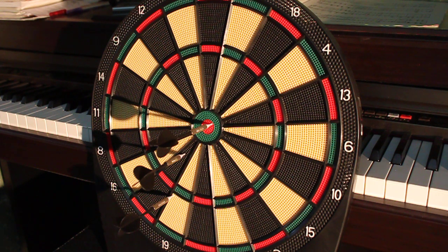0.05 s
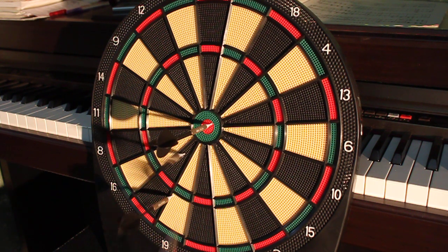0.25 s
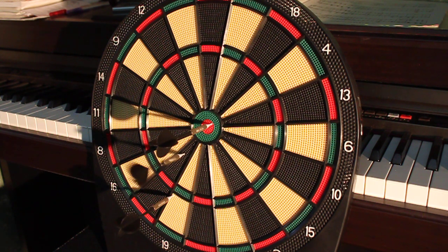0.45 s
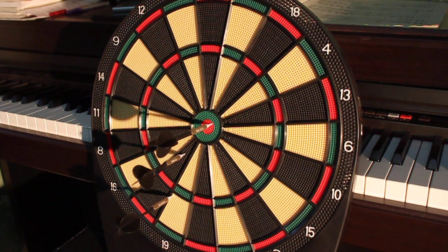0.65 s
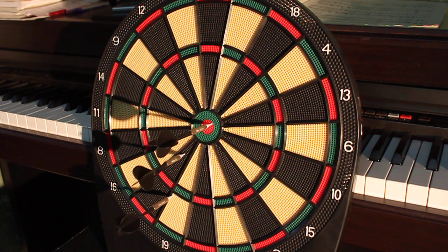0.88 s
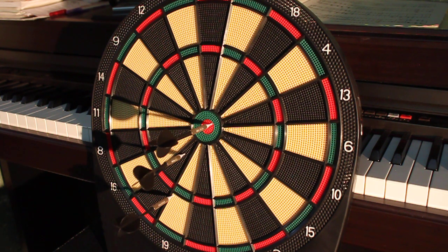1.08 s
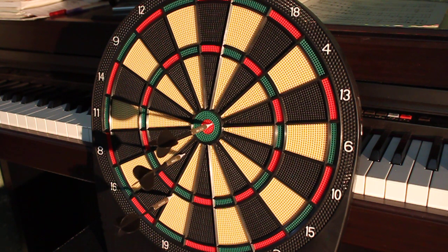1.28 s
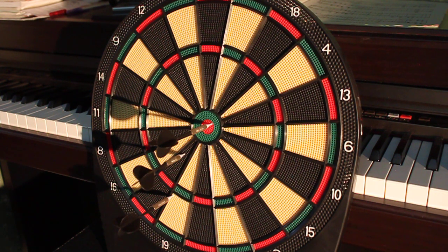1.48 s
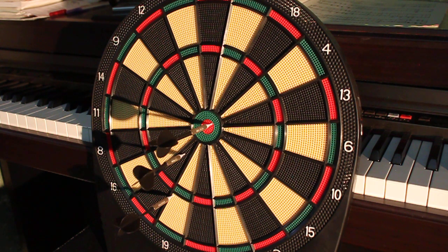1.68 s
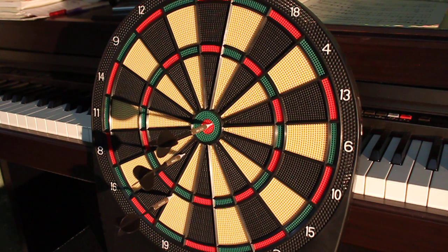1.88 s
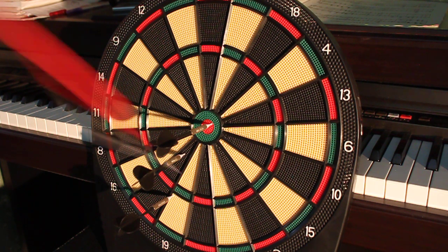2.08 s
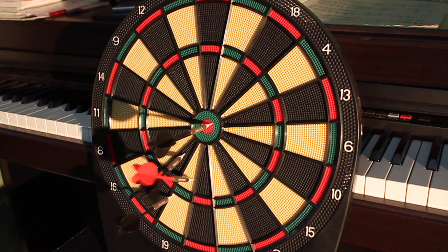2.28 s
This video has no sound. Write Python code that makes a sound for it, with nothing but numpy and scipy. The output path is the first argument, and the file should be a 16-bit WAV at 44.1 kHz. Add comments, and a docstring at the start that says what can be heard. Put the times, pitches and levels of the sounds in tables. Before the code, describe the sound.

Two darts strike a plastic electronic dartboard about two seconds apart, each with a sharp clack and short rattle. Two soft thumps and a faint rustle fall between them, heard close up in a small room with low hum.

```python
"""Two soft-tip darts hit a plastic electronic dartboard, close up in a small room.
Each tip ticks into its hole, then the segment slams into the case, which rings and rattles.
Two soft thumps fall between the throws, with faint rustles around them. The recorder's gain
control ducks at each hit and slowly lets the room noise and mains hum swell back."""
import sys
import numpy as np
from scipy import signal
from scipy.fft import rfft, irfft, next_fast_len
from scipy.io import wavfile
from scipy.ndimage import uniform_filter1d, minimum_filter1d

SR = 44100
rng = np.random.default_rng(int(sys.argv[2]) if len(sys.argv) > 2 else 0)


def dump(signal):
    """Clip the signal to [-1, 1] and save it as 16-bit WAV at the path in sys.argv[1]."""
    limited = np.clip(np.atleast_2d(signal).T, -1, 1)
    pcm = np.round(limited * 32767).astype(np.int16)
    wavfile.write(sys.argv[1], SR, pcm)


N = 108045
T = np.arange(int(.7 * SR)) / SR  # time within one hit, s


def amp(db):
    """Decibels to gain."""
    return 10 ** (np.asarray(db) / 20)


def along(points, hz):
    """Read a curve of (Hz, value) points on a log frequency axis."""
    f, v = np.transpose(points)
    return np.interp(np.log(hz + 1), np.log(f + 1), v)


def fade(t60, t=T):
    """Exponential decay, 60 dB down after t60 seconds."""
    return np.exp(-np.log(1000) * t / t60)


def rise(attack_s):
    """Exponential attack toward full level."""
    return 1 - np.exp(-T / attack_s)


def add(track, s, sound):
    """Mix a sound in at s seconds."""
    part = track[round(s * SR):][:len(sound)]
    part += sound[:len(part)]


def coloured(x, db_at):
    """Minimum-phase EQ with gain db_at(hz): nothing rings ahead of a transient."""
    m = 2 * next_fast_len(len(x))
    cepstrum = irfft(np.log(amp(db_at(np.fft.rfftfreq(m, 1 / SR)))), m)
    cepstrum[1:m // 2] *= 2
    cepstrum[m // 2 + 1:] = 0
    return irfft(rfft(x, m) * np.exp(rfft(cepstrum)), m)[:len(x)]


def normalised(x):
    """Scale to the energy of 2 ms at full level."""
    return x / np.linalg.norm(x) * np.sqrt(.002 * SR)


def burst(envelope, colour, rings_hz=(), octaves=1, peak_db=8.5):
    """A contact: enveloped noise through an EQ with resonant peaks, `octaves` in half-width."""
    def db_at(hz):
        peaks = sum(peak_db / (1 + (np.log2((hz + 1) / centre) / octaves) ** 2) for centre in rings_hz)
        return along(colour, hz) + peaks
    return normalised(coloured(envelope * rng.standard_normal(len(T)), db_at))


def ring(modes, attack_s):
    """Damped (Hz, dB, t60) modes, each struck about 1 dB differently every time."""
    waves = [amp(db + rng.normal()) * fade(t60) * np.sin(2 * np.pi * hz * T) for hz, db, t60 in modes]
    return sum(waves) * rise(attack_s)


# Room tone EQ: f/Hz, level/dB
AIR_EQ = [(20, -9.5), (55, -12), (150, -13), (260, -14.5), (700, -9.5), (1100, -6.5), (2000, -14),
          (3000, -12), (5000, -18.5), (8000, -26.5), (13000, -28), (15800, -28.5)]
# Mains harmonics: harmonic number, level/dB
HUM_HARMONICS = [(1, -55), (2, -67), (4, -59), (5, -62.5), (6, -64.5), (7, -63.5), (9, -54), (11, -58.5)]

def background(air_db=-46.5, mains_hz=59.74):
    """A steady bed of room noise and mains hum."""
    air = coloured(rng.standard_normal(N), lambda hz: along(AIR_EQ, hz))
    cycles = mains_hz * np.arange(N) / SR
    hum = sum(amp(db) * np.sqrt(2) * np.sin(2 * np.pi * (k * cycles + rng.random()))
              for k, db in HUM_HARMONICS)
    return amp(air_db) * air / air.std() + hum


# Rustle cues: t/s, length/s, level/dB
RUSTLE_CUES = [(0, 0.057, -39.5), (0.779, 0.056, -72), (1.41, 0.32, -49.5)]
# Rustle EQ: f/Hz, level/dB
RUSTLE_EQ = [(300, -11), (1500, -0.5), (3500, -1.5), (5200, 0), (7000, -8), (15000, -16.5)]

def rustles():
    """Faint rustles in the room: short, soft swells of bright noise."""
    out, t = np.zeros(N), np.arange(N) / SR
    for s, length, db in RUSTLE_CUES:
        noise = coloured(rng.standard_normal(N), lambda hz: along(RUSTLE_EQ, hz))
        progress = np.clip((t - s) / length, 0, 1)
        swell = 2 * np.sqrt(progress) * (1 - progress)
        out += amp(db) * swell * noise / noise.std()
    return out


# Tip contacts: t/s, level/dB, t60/s, low ring f/Hz, high ring f/Hz
TICK_CUES = [(0.2087, -1.5, 0.0013, 7600, 14960), (0.2121, -2.5, 0.0022, 7000, 14200),
             (0.2159, -9, 0.008, 7080, 13000), (2.1083, 0, 0.0065, 5010, 12000),
             (2.1155, -14.5, 0.016, 6410, 7300), (2.1246, -3, 0.003, 6900, 12100),
             (2.1445, -13, 0.0065, 6200, 13700)]
# Bright plastic tip EQ: f/Hz, level/dB
TIP_EQ = [(200, -28.5), (1000, -24.5), (2800, -18.5), (4300, -5.5), (5500, -4.5), (7000, -8.5),
          (9200, -4.5), (11000, -8), (14000, -6.5), (16000, -3.5)]

def tip_ticks(echo_db=-14.5):
    """Each plastic tip ticks a few times against its hole, with a touch of room."""
    out = np.zeros(N)
    for s, db, t60, *rings_hz in TICK_CUES:
        tick = burst(fade(t60) * rise(0.00035), TIP_EQ, rings_hz, octaves=0.08)
        add(out, s, amp(db) * (tick + amp(echo_db) * echo(TIP_EQ)))
    return out


# Reverb time of the small room: f/Hz, t60/s
ROOM_DECAY = [(100, .33), (400, .44), (1000, .45), (3000, .45), (6000, .33), (14000, .22)]

def echo(colour, ripple_db=2.5, ripple_step_hz=35):
    """The room's diffuse tail: the treble dies first, and room resonances ripple the spectrum."""
    hz, t, spectrum = signal.stft(rng.standard_normal(len(T)), SR, nperseg=256)
    decay = fade(along(ROOM_DECAY, hz)[:, None], t)
    tail = signal.istft(spectrum * decay, SR, nperseg=256)[1][:len(T)]
    onset = 1 - np.exp(-(T / 0.0013) ** 2)
    knots_hz = np.arange(0, SR / 2, ripple_step_hz)
    ripple = ripple_db * rng.standard_normal(len(knots_hz))
    return normalised(coloured(tail * onset, lambda f: along(colour, f) + np.interp(f, knots_hz, ripple)))


# Segments slamming home: t/s, level/dB; case level/dB, f/Hz, t60/s; clack level/dB, f/Hz, t60/s;
# crack t60/s, low ring f/Hz, high ring f/Hz; board thud level/dB
SLAM_CUES = [(0.2186, 7, 5.5, 397.4, 0.019, 5, 1349, 0.0067, 0.011, 1950, 5790, -22),
             (2.1250, -2, 2, 497, 0.032, -9, 1268, 0.044, 0.015, 3200, 3410, -9)]
# EQs of the crack, the loose parts and the slam's echo: f/Hz, level/dB
CRACK_EQ = [(60, -23), (250, -8), (450, -5), (750, -9), (1200, -12.5), (1900, -5.5), (2500, -7.5),
            (3600, -6.5), (4600, -4.5), (5600, -2), (7000, -1.5), (10000, -6.5), (14000, -7), (16000, -15)]
RATTLE_EQ = [(60, -16.5), (160, -18), (450, 0), (750, 0.5), (1200, -8), (2300, -4), (5000, -10),
             (9000, -14.5), (16000, -16.5)]
SLAM_ECHO_EQ = [(60, -23.5), (130, -1), (300, 3.5), (500, 6), (800, 2.5), (1250, 1.5), (2200, -3.5),
                (5000, -2.5), (8000, -11), (12000, -13), (16000, -21.5)]

def segment_slams(rattles_per_s=230, echo_db=-4):
    """The segment cracks and clacks into the hollow case, which knocks and shakes its loose parts."""
    out = np.zeros(N)
    for s, db, *layers, _ in SLAM_CUES:
        case_db, case_hz, case_t60, clack_db, clack_hz, clack_t60, crack_t60, *rings_hz = layers
        crack = amp(0.5) * burst(fade(crack_t60) * rise(0.00044), CRACK_EQ, rings_hz, octaves=0.14)
        case_tail = (case_hz, case_db - 26.5, 0.22)  # rings on faintly after the knock
        case = ring([(case_hz, case_db, case_t60), case_tail], attack_s=0.0021)
        clack = ring([(clack_hz, clack_db, clack_t60)], attack_s=0.00049)
        contacts = rng.random(len(T)) < rattles_per_s / SR
        chatter = signal.fftconvolve(contacts, fade(t60=.006))[:len(T)]
        rattle = amp(-4) * burst((0.52 + chatter) * fade(t60=.07), RATTLE_EQ)
        add(out, s, amp(db) * (crack + clack + case + rattle + amp(echo_db) * echo(SLAM_ECHO_EQ)))
    return out


# The whole board rocking on its mount: f/Hz, level/dB, t60/s
THUD_MODES = [(158, -1, 0.12), (203, -0.5, 0.11)]
# The board's ring-out: f/Hz, level/dB, t60/s
BOARD_MODES = [(253, -17, 0.09), (405.6, -28, 0.46), (608, -16.5, 0.16), (724, -26, 0.25),
               (914, -22.5, 0.12), (1245, -11, 0.064), (1314, -25.5, 0.11), (1580, -18, 0.04),
               (1714, -19, 0.09), (1980, -24, 0.14), (2250, -20.5, 0.088), (3560, -25, 0.16),
               (7000, -24, 0.12), (7430, -26, 0.15)]

def board():
    """Each slam rocks the board with a low thud and leaves its modes ringing faintly."""
    out = np.zeros(N)
    for s, db, *_, thud_db in SLAM_CUES:
        thud = amp(thud_db) * ring(THUD_MODES, attack_s=0.0096)
        ring_out = amp(-3) * ring(BOARD_MODES, attack_s=.001)
        add(out, s, amp(db) * (thud + ring_out))
    return out


# Thump cues: t/s, level/dB, pitch ratio, scuff level/dB
THUMP_CUES = [(0.622, -15, 1, -21), (1.009, -24.5, 0.96, -5)]
# Low floor modes: f/Hz, level/dB, t60/s
THUMP_MODES = [(200.5, 7.5, 0.08), (244.4, -2, 0.12)]

def thumps():
    """Dull, soft knocks on the floor, with a trace of scuff and a boomy echo."""
    scuff_eq = [(60, 11), (350, 14), (800, -2), (3000, -35), (5500, -3), (9000, -12.5), (15000, -13.5)]
    boom_eq = [(40, 1.5), (80, -12), (200, -3), (300, -14.5), (500, -24), (2000, -57)]
    out = np.zeros(N)
    for s, db, pitch, scuff_db in THUMP_CUES:
        scuff = amp(scuff_db) * burst(fade(t60=.03) * rise(0.0003), scuff_eq)
        boom = amp(-2.5) * echo(boom_eq)
        body = ring([(hz * pitch, mode_db, t60) for hz, mode_db, t60 in THUMP_MODES], attack_s=0.015)
        add(out, s, amp(db) * (body + scuff + boom))
    return out


def scene():
    """The mono mix: dart hits, thumps and rustles over the room's bed."""
    return (tip_ticks() + segment_slams() + board() + thumps() + rustles() + background())[None]


def gain_control(x, ceiling_db=-9, attack_s=0.0028, hold_s=0.68, recover_db_per_s=12.5):
    """The gain ducks fast on a loud hit, holds, then climbs back steadily."""
    level_db = 10 * np.log10(np.abs(uniform_filter1d(x * x, size=88)) + 1e-12)  # 2 ms RMS detector
    duck_db = np.minimum(ceiling_db - level_db, 0)
    hold = int(hold_s * SR)
    held_db = minimum_filter1d(duck_db, hold, origin=(hold - 1) // 2, mode="nearest")
    climb_db = recover_db_per_s * np.arange(N) / SR
    gain_db = np.minimum.accumulate(held_db - climb_db) + climb_db
    return x * amp(uniform_filter1d(gain_db, int(attack_s * SR)))


def record(dry):
    """Microphone low cut, gain control, soft clipping and a steep high cut."""
    low_cut_hz, high_cut_hz = 110, 16000
    low_cut = signal.butter(2, low_cut_hz, "highpass", fs=SR, output="sos")
    ducked = gain_control(signal.sosfilt(low_cut, dry[0]))
    clipped = ducked / (1 + ducked ** 4) ** (1 / 4)
    m = next_fast_len(N + SR // 2)
    high_cut = 1 / (1 + (np.fft.rfftfreq(m, 1 / SR) / high_cut_hz) ** 120)
    return irfft(rfft(clipped, m) * high_cut, m)[None, :N]


dry = scene()
out = record(dry)
dump(out)
```